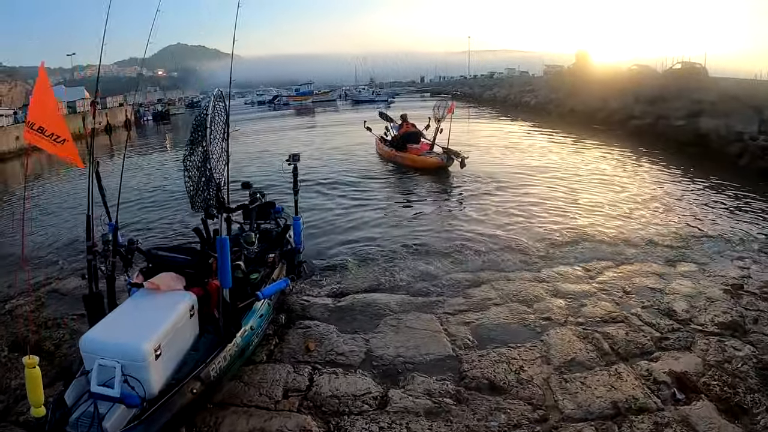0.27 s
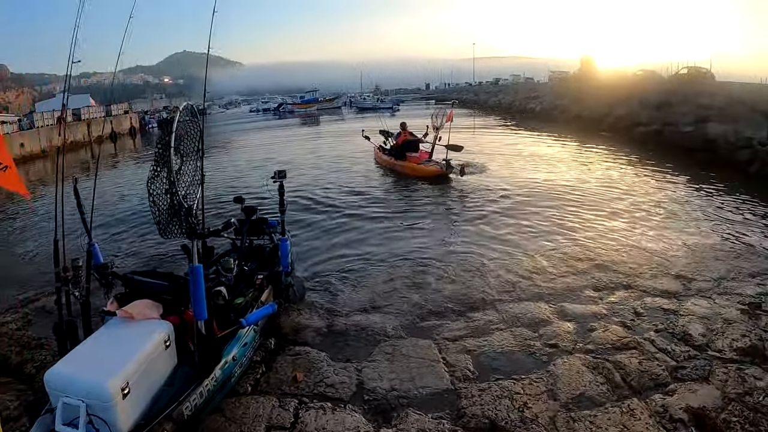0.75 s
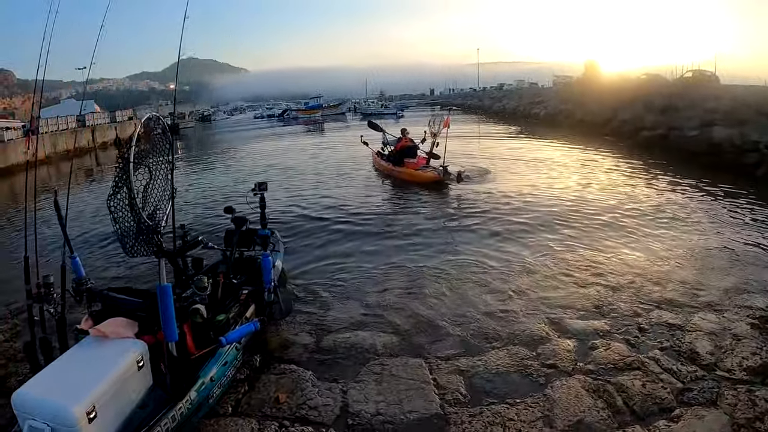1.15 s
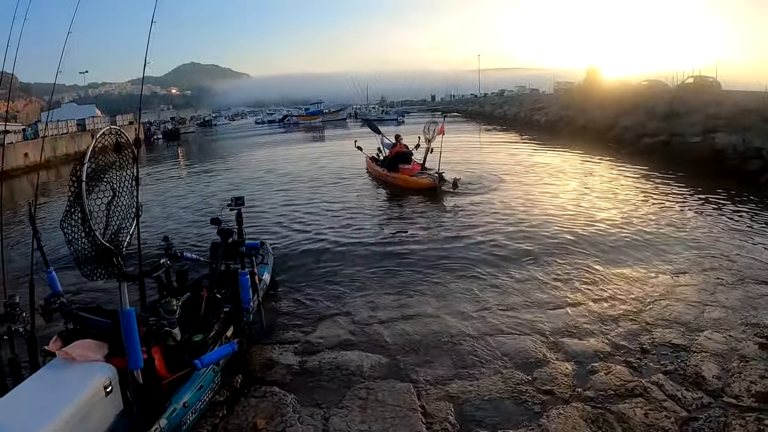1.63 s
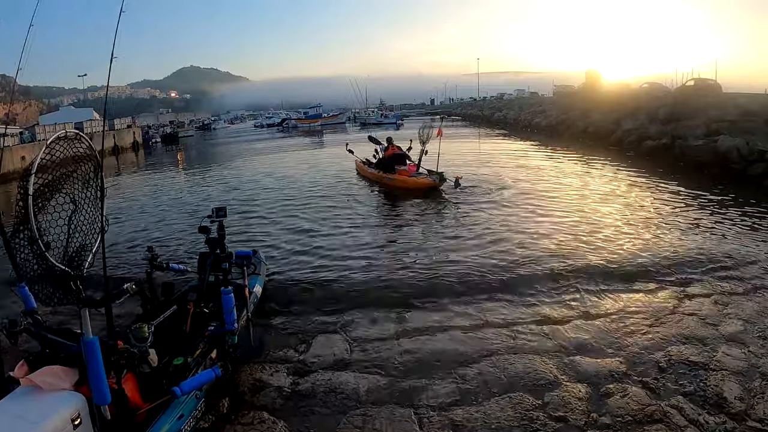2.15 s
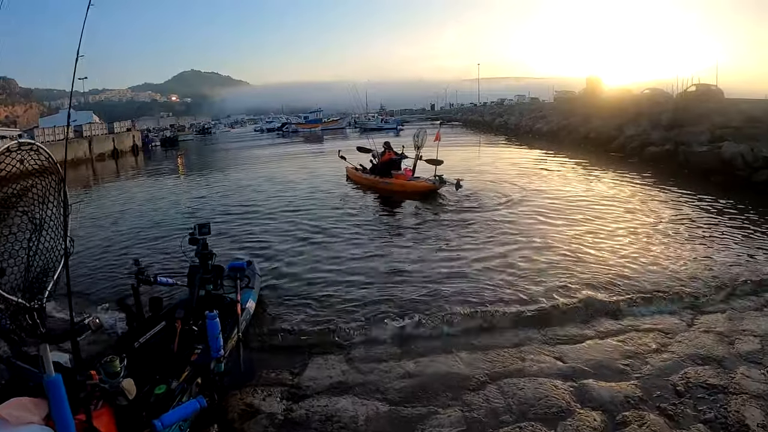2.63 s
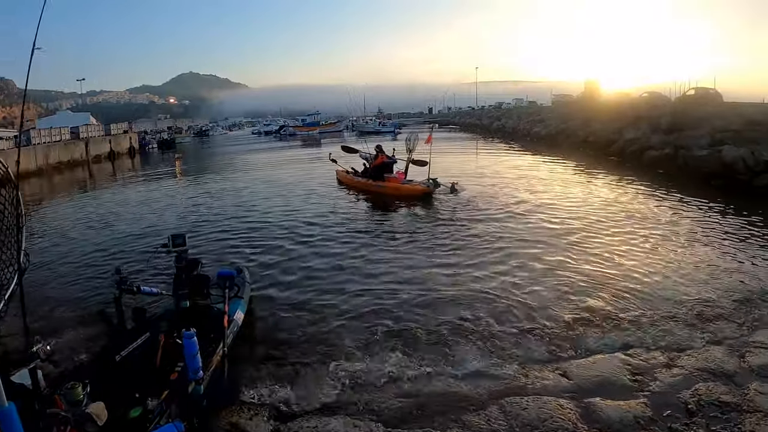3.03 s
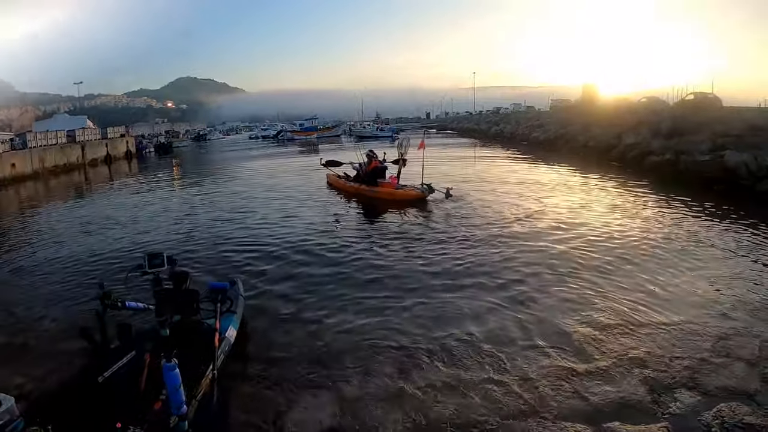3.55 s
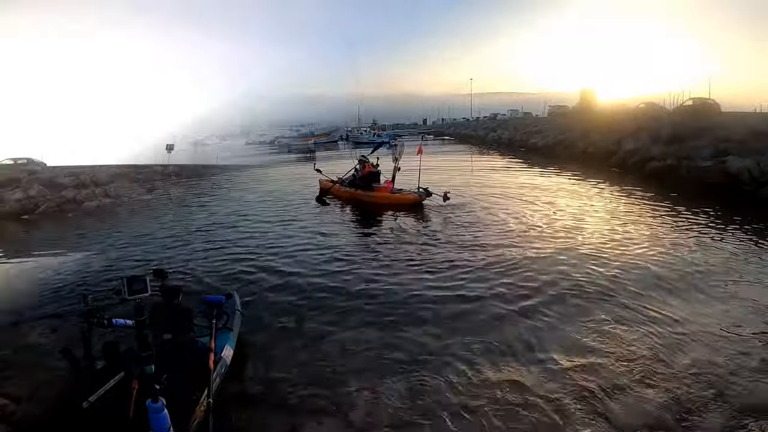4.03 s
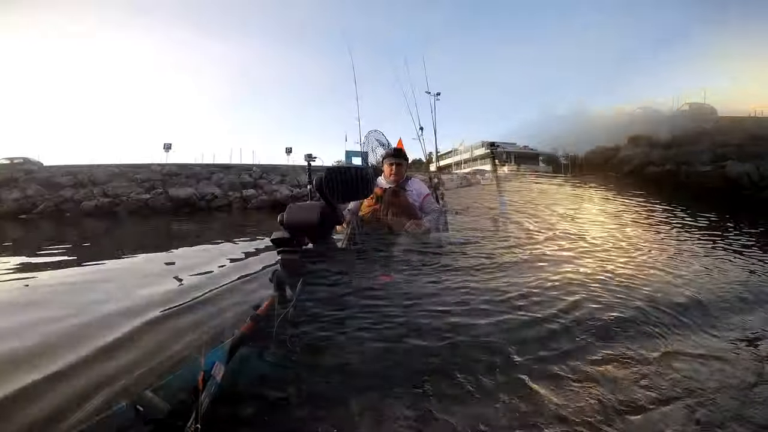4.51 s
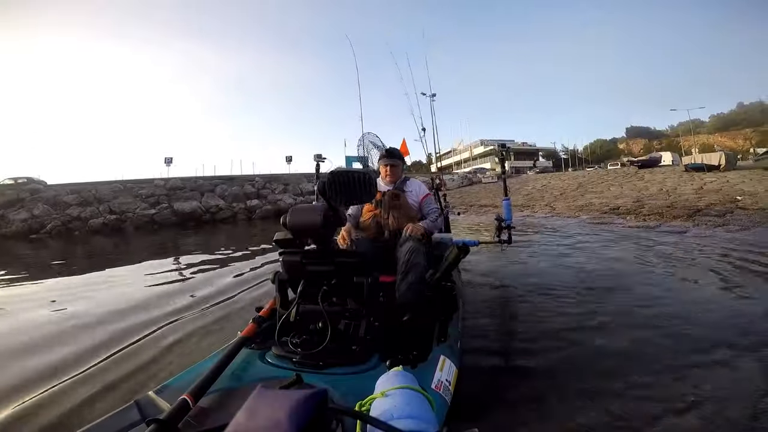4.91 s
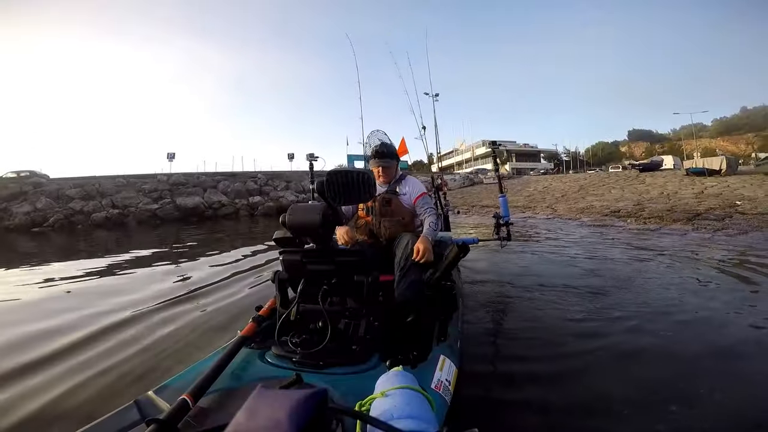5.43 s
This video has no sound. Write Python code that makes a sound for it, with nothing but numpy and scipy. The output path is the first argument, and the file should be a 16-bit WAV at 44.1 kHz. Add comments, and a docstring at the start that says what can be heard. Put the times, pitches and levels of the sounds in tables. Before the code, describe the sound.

Small waves wash and gurgle over a stone slipway, then fade as gear knocks and thumps on a plastic kayak.

```python
"""A stone slipway: two small waves wash up as foam noise and resonating bubbles, with glugs and splashes.
A stereo microphone pair hears them from the shore, with wind rumbling on its ports and a far gull.
The sound then fades over to a mono camera fixed on a plastic kayak: thumps excite the modes of its
mount, water slops, gear knocks the hull into damped vibration and the electronics whine faintly."""
import sys
import numpy as np
from scipy import signal
from scipy.fft import rfft, irfft, next_fast_len
from scipy.io import wavfile
from scipy.ndimage import uniform_filter1d

SR = 44100
rng = np.random.default_rng(int(sys.argv[2]) if len(sys.argv) > 2 else 0)


def master(y):
    """Save y as 16-bit WAV."""
    cut = np.clip(np.atleast_2d(y).T, -1, 1)
    pcm = np.round(cut * 32767)  # scale
    wavfile.write(sys.argv[1], SR, pcm.astype(np.int16))


N = 250047
TIME = np.arange(N) / SR
SHORE_FADE_S, CAMERA_RISE_S = (3.65, 5.16), (2.9, 5.16)
ASHORE = np.interp(TIME, SHORE_FADE_S, [1, 0])   # gain of the shore pair
FFT_SIZE = next_fast_len(N)
FFT_HZ = np.arange(FFT_SIZE // 2 + 1) * SR / FFT_SIZE + 1   # 1 Hz up keeps the logarithm finite

def from_db(db):
    return 10 ** (np.asarray(db) / 20)

def unit_rms(x):
    return x / np.sqrt(np.mean(x ** 2) + 1e-20)

def in_time(points):
    return np.interp(TIME, *np.transpose(points))

def at_hz(points, hz):
    knots_hz, values = np.transpose(points)
    return np.interp(np.log(hz), np.log(knots_hz), values)

def band(x, low_hz, high_hz):
    sos = signal.butter(2, [low_hz, min(high_hz, SR / 2.2)], "band", fs=SR, output="sos")
    return signal.sosfilt(sos, x)

def brown(white):
    """Leaky integration tilts noise towards the bass."""
    return signal.lfilter([1], [1, -.99], white)

def drift(rate_hz):
    """Low-passed noise gives a slow random fluctuation of unit rms."""
    r = np.exp(-80 * np.pi * rate_hz / SR)
    slow = signal.lfilter([1], [1, -2 * r, r * r], rng.standard_normal(N // 40 + 2002))[2000:]
    return np.interp(np.arange(N) / 40, np.arange(len(slow)), unit_rms(slow))

def ring(force, hz, t60):
    """A damped oscillator answers each impulse with a decaying sine."""
    r, w = from_db(-60 / (t60 * SR)), 2 * np.pi * hz / SR
    return signal.lfilter([0, np.sin(w)], [1, -2 * r * np.cos(w), r * r], force + 1e-18)

def add(out, start_s, sound):
    at = round(start_s * SR)
    out[..., at:at + sound.shape[-1]] += sound[..., :N - at]

# Coherence of the two shore ports: f/Hz, coherence/1
COHERENCE = [(200, .995), (700, .96), (1500, .87), (3000, .8), (6000, .55), (8000, .2), (12000, .15)]
def shore_pair(sound, other, hz, pan_db):
    """Partial coherence: the left port hears the sound 3 samples late, blended with another signal."""
    alike = np.clip(at_hz(COHERENCE, hz), 0, 1)
    left = alike * np.roll(sound, 3) + np.sqrt(1 - alike ** 2) * other
    tilt = from_db(pan_db * np.clip(np.log2(hz / 150) / 2, 0, 1) / 2)   # the bass stays central
    return np.array([left * tilt, sound / tilt])

# Shadow of the housing: f/Hz, left minus right level/dB
HOUSING_SHADOW = [(200, 0), (2500, 0.5), (4500, 2.5), (6500, -11), (8000, -19), (15000, -13)]
def shade_left(pair):
    """Acoustic shadowing: the housing screens the left port from short wavelengths."""
    tilt = from_db(at_hz(HOUSING_SHADOW, FFT_HZ) / 2)
    gains = np.array([tilt, 1 / tilt]) / np.sqrt((tilt ** 2 + tilt ** -2) / 2)
    return irfft(rfft(pair, FFT_SIZE) * gains, FFT_SIZE)[:, :N]

# Breaking waves: crest t/s, level/dB, crest rounding/s, ebb rate/(dB/s), backwash re crest/dB
BREAKERS = [(0.07, -15, 0.22, 27, -11.5), (3.028, -15.5, 0.3, 47.5, -18.5)]
def wave_envelope(hz, swell_db_per_s=55.5, backwash_db_per_s=5, backwash_rise_s=0.27):
    """Incoherent sources add in power: each wave swells, ebbs and leaves a slow backwash."""
    t, power = np.arange(0, N + 40, 40) / SR, 0
    lead_s = 0.023 * max(np.log2(hz / 1000), 0)   # the fizz of the front arrives first
    bass_cut_db = 2.5 * np.clip(np.log2(900 / hz), 0, 1.2)
    swell = swell_db_per_s * (hz / 1000) ** -0.047   # more gradual in the treble
    for crest, db, rounding, ebb, backwash_db in BREAKERS:
        age = t - crest + lead_s
        slope = np.where(age < 0, swell, ebb * (hz / 1000) ** -0.061)   # gurgle ebbs faster than fizz
        surge = from_db(-slope * (np.hypot(age, rounding) - rounding))
        backwash = from_db(backwash_db - bass_cut_db - backwash_db_per_s * age)
        backwash *= np.clip(age / backwash_rise_s, 0, 1)
        power = power + from_db(db) ** 2 * (surge ** 2 + backwash ** 2)
    return np.interp(TIME, t, np.sqrt(power))

# Spectrum of rushing water: f/Hz, relative density level/dB
WATER_SPECTRUM = [(100, -34), (170, -12.5), (272, -14), (305, -7.5), (429, -5), (569, -6.5), (700, -1),
                  (862, -14.5), (947, -4), (1400, -4), (2050, -9), (3110, -9), (5580, -18), (6870, -27.5),
                  (12300, -47.5), (15500, -54)]
# The wash comes from the right, the backwash drains from ahead: t/s, left minus right level/dB
WATER_PAN = [(0, -4), (1.1, -3.5), (1.7, 3), (2.25, -0.5), (2.55, 1.5), (2.8, -3.5), (5, -3)]
def waves(bubbles_per_s=90, bubble_share=0.53, size_db=4.5, t60_cycles=24, patchy_db=2):
    """Bubble resonance: each third octave holds foam hiss and randomly excited, ringing bubbles."""
    pan_db, edges = in_time(WATER_PAN), 170 * 2 ** np.arange(0, 6.6, 1 / 3)
    white, surge, chance = rng.standard_normal((2, 2, N)), drift(11), rng.random(N)
    sizes = from_db(size_db * np.minimum(rng.exponential(1, N), 4)) * rng.choice([-1, 1], N)
    bands, mid_power = 0, 0
    for k, (low, high) in enumerate(zip(edges, edges[1:])):
        hz = np.sqrt(low * high)
        foam, other = band(white[k % 2], low, high) * np.sqrt(SR / 2 / (high - low))
        births = sizes * (chance < bubbles_per_s * (hz / 1000) ** .8 / SR)   # small bubbles are many
        pops = sum(ring(np.roll(births, rng.integers(N)), hz * tune, t60_cycles / hz)
                   for tune in (.93, 1, 1.08))
        share = np.clip(bubble_share * (1000 / hz) ** 0.052, 0, 1)
        water = np.sqrt(1 - share) * foam + np.sqrt(share) * unit_rms(pops)
        level = from_db(at_hz(WATER_SPECTRUM, hz)) * np.sqrt(high - low)
        mid_power += level ** 2 * (500 < hz < 3000)
        gain = level * wave_envelope(hz) * from_db(patchy_db * (0.39 * surge + drift(13.3)))
        bands = bands + gain * shore_pair(water, other, hz, pan_db)
    return bands / np.sqrt(mid_power)

# Deepest rumble, around the sway frequency of the mount: t/s, level/dB
DEEP_RUMBLE = [(0, -26), (.6, -41), (1.3, -22.5), (1.75, -33.5), (2.7, -26.5), (3.3, -33.5), (3.68, -26),
               (4.18, -39.5), (4.6, -20.5), (4.9, -27), (5.4, -25.5), (5.55, -40), (5.67, -15.5)]
def rumble(lumpy_db, wind_db=-32, lapping_db=-49):
    """Random forcing: wind on shore and water rocking the mount on board give uneven low noise."""
    white = rng.standard_normal((2, N + 9000))
    deep = unit_rms(band(white[0], 19.4, 50.6)[9000:])
    deep *= from_db(in_time(DEEP_RUMBLE) + lumpy_db * drift(3))
    low = unit_rms(band(brown(white[1]), 56.4, 213)[9000:]) * from_db(lumpy_db * drift(8.2))
    return deep + low * (from_db(wind_db) * ASHORE + from_db(lapping_db) * (1 - ASHORE))

# Single bubbles and drips: t/s, level/dB, f/Hz
BUBBLES = [(.127, -3.5, 940), (.169, -8.5, 174), (.199, -7, 720), (.218, -14.5, 170), (.222, -3, 973),
           (.51, -14.5, 378), (.715, -17, 1210), (.878, -14.5, 600), (1.039, -21, 545), (1.101, -19.5, 528),
           (1.149, -19, 626), (1.202, -16, 1250), (1.499, -23, 513), (1.693, -20.5, 1150),
           (1.768, -35, 9700), (2.086, -34, 12200), (2.202, -34, 8140), (2.263, -13.5, 2980),
           (2.295, -17.5, 366), (2.34, -22, 615), (2.385, -19, 5600), (2.429, -21.5, 530),
           (2.453, -26, 1040), (2.642, -10.5, 950), (2.747, -12, 555), (2.765, -7.5, 868),
           (2.92, -6.5, 417), (2.991, -2, 725), (3.1, -4.5, 431), (3.453, -14.5, 350), (3.623, -19.5, 1283),
           (3.726, -16.5, 1150), (3.901, -18.5, 1100), (3.915, -22, 1300), (4.055, -18, 1720),
           (4.066, -10.5, 2550)]
def glugs():
    """A bubble is a damped oscillator whose frequency rises a little as it dies away."""
    out, pan_db, t = np.zeros((2, N)), in_time(WATER_PAN), np.arange(4000) / SR
    for start, db, hz in BUBBLES:
        cycles = 14 * (hz / 1000) ** .4   # to fall 30 dB; smaller bubbles ring more cycles
        age = t * hz / cycles
        envelope = from_db(db - 30 * age) * np.minimum(age / 0.11, 1)
        glug = envelope * np.sin(2 * np.pi * hz * t * (0.989 + 0.036 * age))
        delayed = np.append(np.zeros(9), glug[:-9])
        add(out, start, shore_pair(glug, delayed, hz, pan_db[round(start * SR)]))
    return out

# Bursts of spray: t/s, initial level/dB, centre f/Hz, T60/s
SPRAY = [(0.721, -20, 1500, 0.1), (.77, -18.5, 2000, .02), (0.892, -23, 880, 0.25),
         (1.175, -29, 8850, .0064), (1.613, -25.5, 2980, 0.079), (2.447, -24.5, 4000, 0.064),
         (2.565, -21, 5350, 0.028), (3.464, -10.5, 3130, 0.033), (3.98, -29, 4170, 0.084),
         (4.054, -24, 3500, .015), (4.09, -24.5, 4470, .017)]
def splashes():
    """A splash is a transient of band-limited noise with exponential decay."""
    out, t = np.zeros((2, N)), np.arange(3000) / SR
    for start, db, hz, t60 in SPRAY:
        octaves = 2.5 * (hz / 1000) ** -0.93   # high splashes span fewer octaves
        edge = 2 ** (octaves / 2)
        spray = unit_rms(band(rng.standard_normal((2, len(t))), hz / edge, hz * edge))
        envelope = from_db(db - 60 * t / t60) * np.minimum(t / 0.00072, 1)
        add(out, start, shore_pair(*(envelope * spray), hz, pan_db=-1.1))
    return out

# Whistles of a far gull: start t/s, end t/s, start f/Hz, end f/Hz, level/dB
GULL_CALLS = [(1.951, 2.056, 2720, 2370, -43), (1.965, 2.058, 3860, 3630, -47),
              (2.134, 2.2, 3830, 3580, -43.5)]
def gull():
    """Random amplitude modulation makes thin, falling tones slightly hoarse."""
    out = np.zeros(N)
    for start, end, start_hz, end_hz, db in GULL_CALLS:
        count = round((end - start) * SR)
        phase = 2 * np.pi * np.cumsum(np.linspace(start_hz, end_hz, count)) / SR
        add(out, start, from_db(db) * np.hanning(count) ** 0.25 * np.sin(phase))
    return out * from_db(3.3 * drift(60))

# Sway, shake and slap modes of the camera mount: f/Hz, T60/s
MOUNT_MODES = [(37.7, 0.7), (88, 0.12), (150, 0.086)]
# Blows through the hull: t/s, sway level/dB, shake level/dB, slap level/dB
BLOWS = [(2.013, -38, -22, -14.5), (3.52, -12, -1.5, -25), (3.747, -15, -29, -48), (3.84, -15, -26, -20),
         (4.467, -17, -35, -14.5), (4.614, -38, 0, -8), (4.64, -7, -2.5, -20), (4.661, -20, -21, -14),
         (4.694, -4, -8, -33), (4.788, -25, -19, -36), (4.976, -15, -14, -20.5), (5.002, -1.5, -11.5, -17),
         (5.149, -34, -6, -18), (5.598, -16, -4.5, -9.5), (5.618, -16, -4, -29)]
def thumps(stilled_s=0.046):
    """Pulse excitation: each soft blow sets the mount's modes ringing and stills what rang before."""
    out, t = np.zeros(N), np.arange(SR // 2) / SR
    next_starts = [blow[0] for blow in BLOWS[1:]] + [N / SR]
    for (start, *levels), following in zip(BLOWS, next_starts):
        stilled = np.clip(1 - (t + start - following) / stilled_s, 0, 1)
        for db, (hz, t60) in zip(levels, MOUNT_MODES):
            pulse = np.hanning(round(SR / hz * .6))   # contact lasts 0.6 of a period
            force = np.pad(pulse / pulse.sum(), (0, len(t) - len(pulse)))
            add(out, start, from_db(db) * stilled * ring(force, hz, t60))
    return out

def slosh(band_hz=(184, 600), t60=0.19, re_blow_db=-26.5):
    """Water slops against the hull after each blow, as low noise in exponential decay."""
    kicks = np.zeros(N)
    for start, *levels in BLOWS:
        kicks[round(start * SR)] = from_db(max(levels) + re_blow_db)
    decay = signal.lfilter([1], [1, -from_db(-60 / (t60 * SR))], kicks)
    envelope = uniform_filter1d(decay, size=600, origin=299)
    return envelope * unit_rms(band(brown(rng.standard_normal(N)), *band_hz))

# Modes of the plastic hull: f/Hz, relative level/dB, T60/s
HULL_MODES = [(580, 24.5, 0.0093), (880, 6, 0.011), (1330, 2.5, 0.031), (1511, 0, 0.032), (1917, -4, 0.031),
              (2380, 2, 0.011), (2916, 5, 0.012), (3540, -3, 0.013), (3650, 3, 0.0097), (4830, -15, .01)]
# Gear striking the hull: t/s, peak level/dB, favoured f/Hz
GEAR_STRIKES = [(2.013, -15, 1030), (3.515, -3, 1260), (4.385, -28, 1500), (4.446, -32, 1180),
                (4.484, -27.5, 1930), (4.504, -29, 1520), (4.531, -21, 696), (4.584, -31, 2400),
                (4.604, -24.5, 3560), (4.61, -24, 1930), (4.639, -30.5, 3280), (4.651, -28.5, 1850),
                (4.698, -29.5, 1380), (4.745, -30, 1350), (4.866, -37, 1330), (4.89, -32, 1650),
                (4.976, -31.5, 3500), (4.981, -34, 1810), (5.137, -31.5, 1250), (5.593, -30.5, 1400)]
def knocks(reach_octaves=0.47):
    """Modal superposition: a dry rattle drives the modes near the frequency the struck spot favours."""
    out, t = np.zeros(N), np.arange(3000) / SR
    hz, mode_db, t60 = np.transpose(HULL_MODES)[:, :, None]
    scatter = 1.6 * rng.standard_normal((len(GEAR_STRIKES), len(HULL_MODES), 1))
    for (start, db, favoured_hz), scatter_db in zip(GEAR_STRIKES, scatter):
        coupling_db = -6 * (np.log2(hz / favoured_hz) / reach_octaves) ** 2
        envelopes = from_db(mode_db + coupling_db + scatter_db - 60 * t / t60)
        modes = np.sum(envelopes * np.sin(2 * np.pi * hz * t), axis=0)
        rattle = rng.standard_normal(300) * np.hanning(300) * 0.13
        rattle[0] = 1   # first contact
        attack = np.minimum(t / 0.00091, 1)   # plastic gives: no sharp edge
        knock = attack * np.convolve(modes, rattle)[:len(t)]
        add(out, start, from_db(db) * knock / np.abs(knock).max())
    return out

# Noise floor of the electronics: f/Hz, relative density level/dB
HISS_SPECTRUM = [(100, -10), (170, -10), (500, -4.5), (1000, -10), (1940, -6), (5000, -15), (6300, -10.5),
                 (7000, -17), (8500, -18), (15500, -27)]
# Spectral lines of the converter: f/Hz, rms level/dB
WHINE_LINES = [(6266, -77), (6293, -51.5), (6325, -63), (6352, -71), (6385, -63), (12618, -76)]
def camera(hiss_db=-50.5, blip_db=-51, blip_hz=8570, blip_s=.009, frames_per_s=29.97):
    """Electronic self-noise: hiss, a wavering converter whine and a faint tone burst on every frame."""
    spectrum = rfft(rng.standard_normal(FFT_SIZE)) * from_db(at_hz(HISS_SPECTRUM, FFT_HZ))
    hiss = from_db(hiss_db) * unit_rms(irfft(spectrum, FFT_SIZE)[:N])
    whine = 0
    for hz, db in WHINE_LINES:
        amplitude = np.sqrt(2) * from_db(db + 0.55 * drift(16))
        whine += amplitude * np.sin(2 * np.pi * hz * TIME + 1.13 * drift(13))
    frame_age = (TIME - .022) % (1 / frames_per_s)
    gate = np.sin(np.pi * np.minimum(frame_age / blip_s, 1)) ** 2
    blips = gate * np.sin(2 * np.pi * blip_hz * TIME) * from_db(blip_db + 1.9 * drift(18))
    return hiss + whine + blips

def scene():
    """Linear superposition: the stereo shore fades out as the mono camera noise comes up."""
    water = shade_left(waves() + glugs() + splashes())
    port_wind = from_db(-25) * rumble(lumpy_db=-3.5) * [[1], [-1]]   # antiphase at the two ports
    mono = gull() + rumble(lumpy_db=2.5) + thumps() + slosh() + knocks()
    return (water + port_wind) * ASHORE + mono + camera() * np.interp(TIME, CAMERA_RISE_S, [0, 1])

def record(dry):
    """Saturation flattens the highest peaks; a low-pass filter stops everything above 16 kHz."""
    return signal.sosfilt(signal.cheby2(12, 70, 16000, fs=SR, output="sos"), np.clip(dry, -1, 1))

dry = scene()
out = record(dry)
master(out)
```